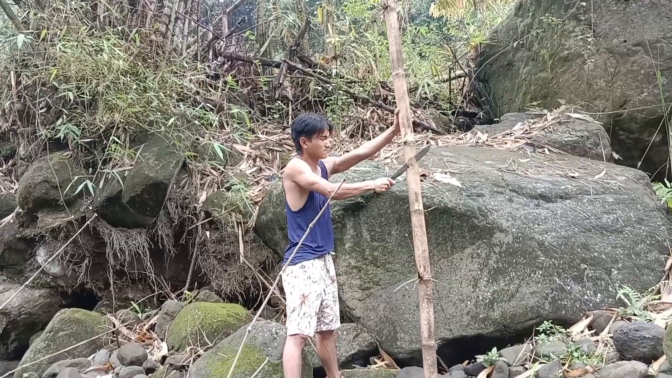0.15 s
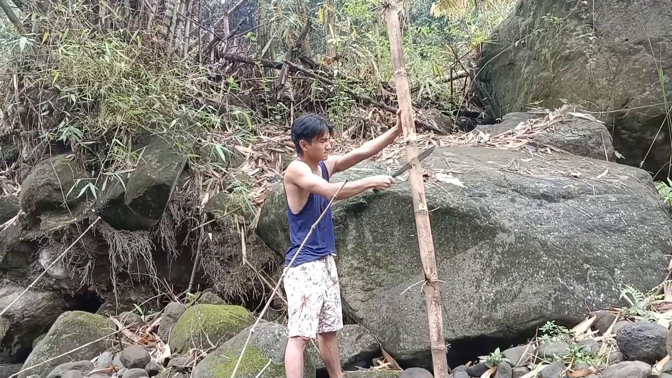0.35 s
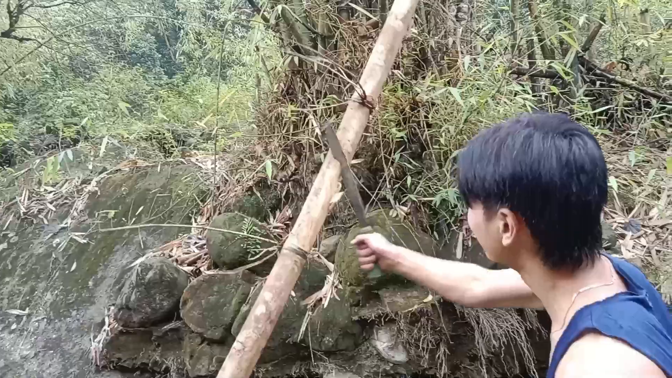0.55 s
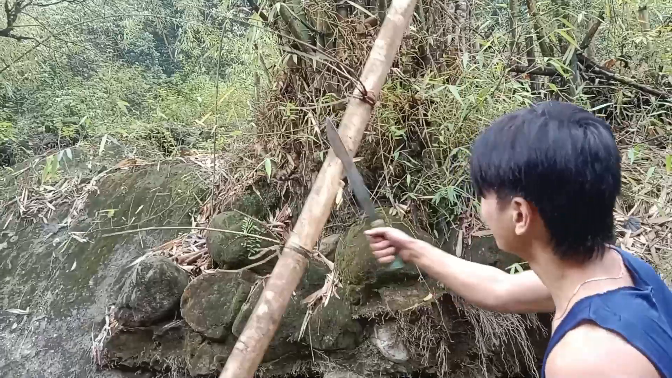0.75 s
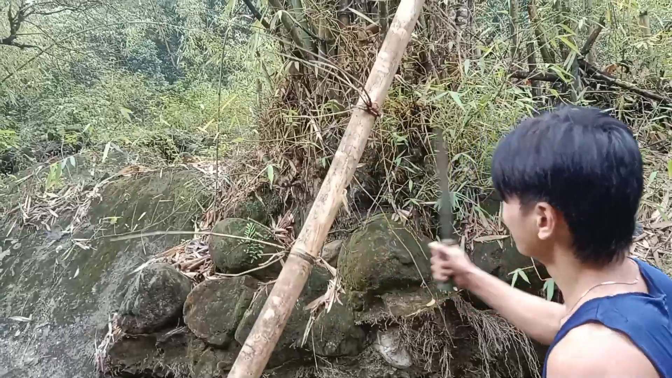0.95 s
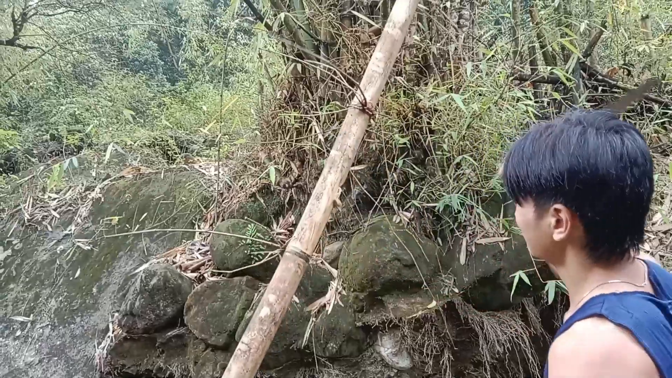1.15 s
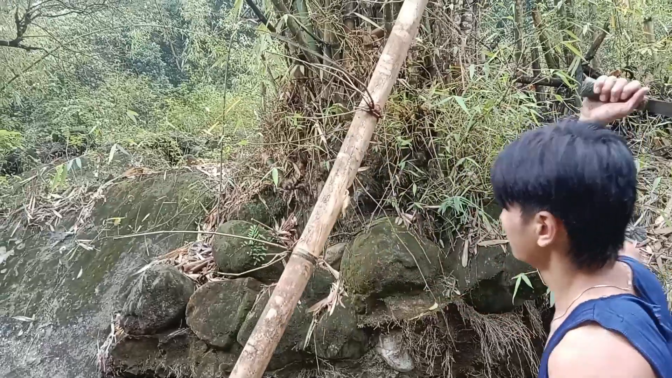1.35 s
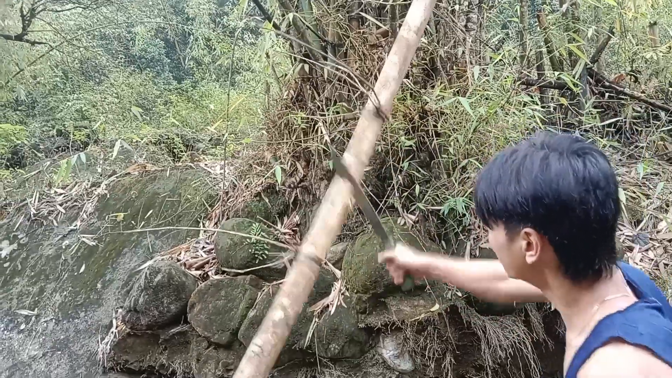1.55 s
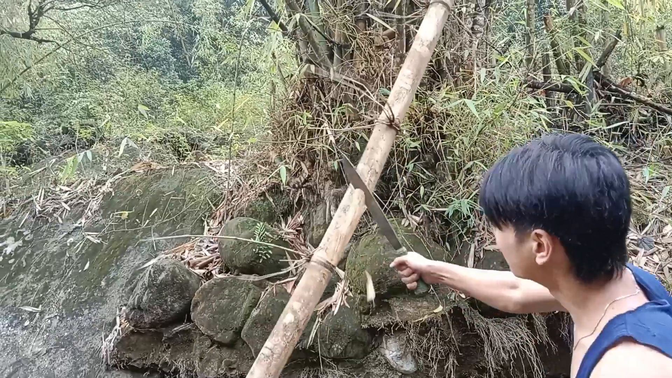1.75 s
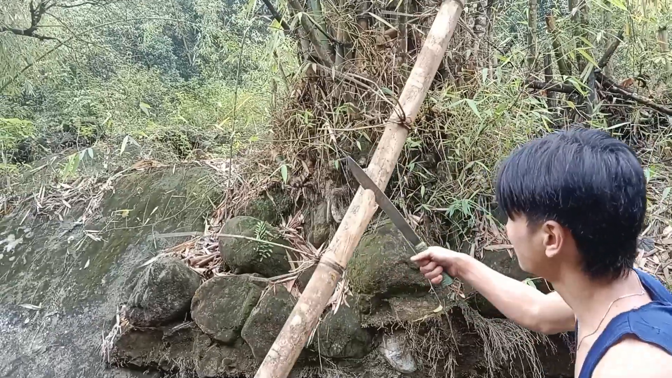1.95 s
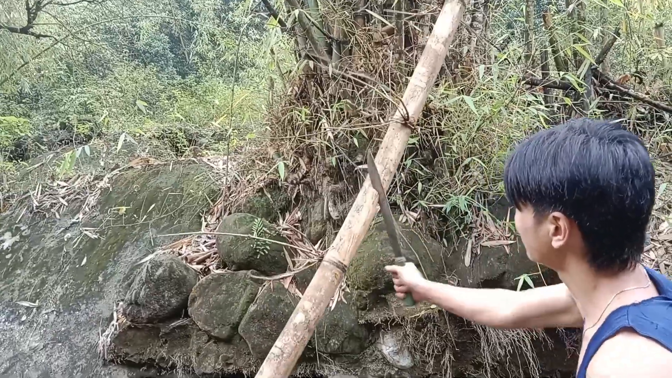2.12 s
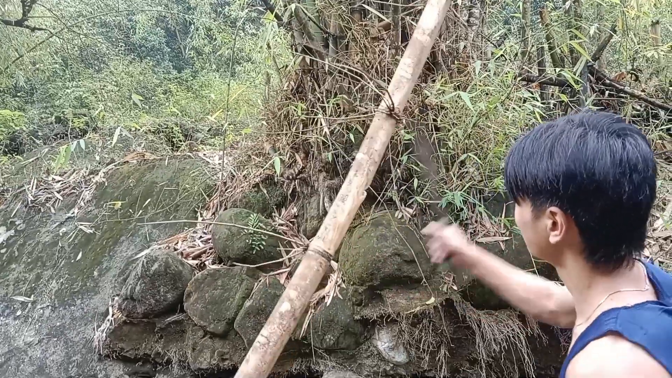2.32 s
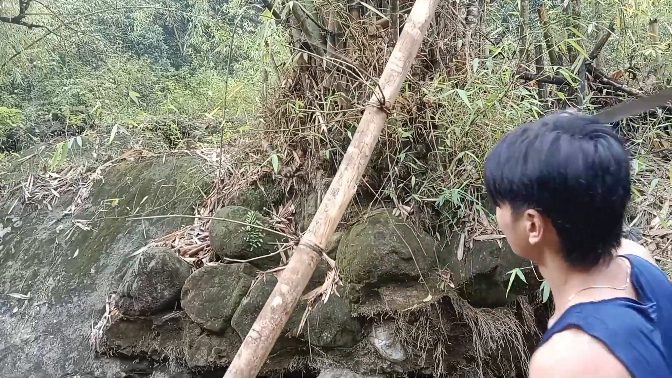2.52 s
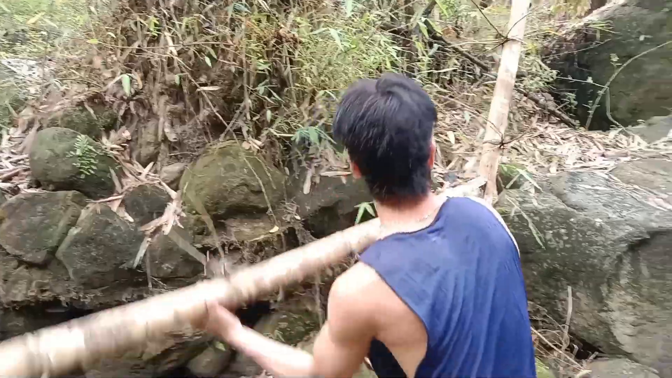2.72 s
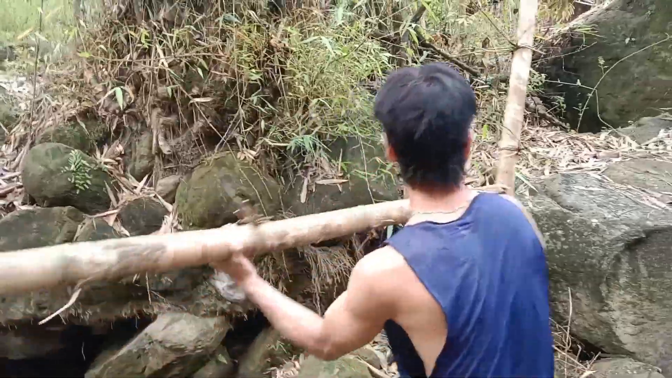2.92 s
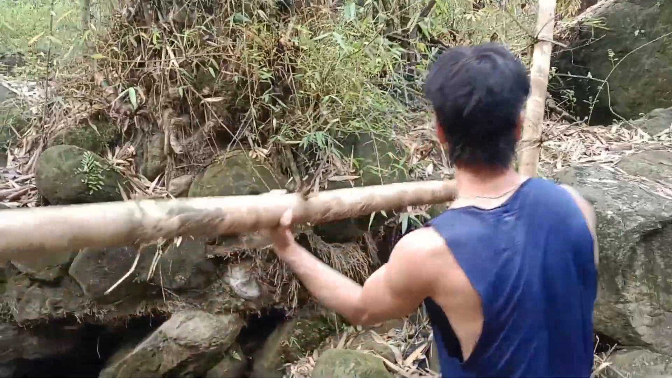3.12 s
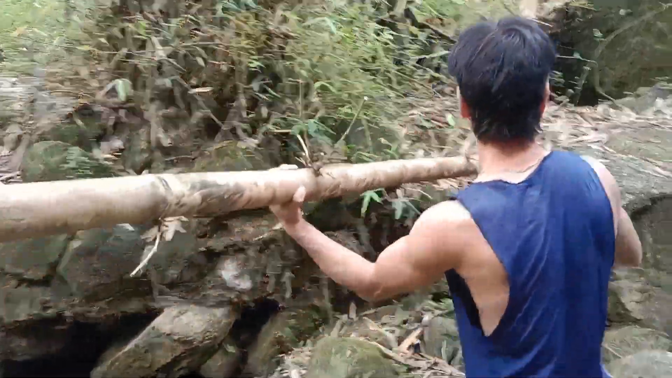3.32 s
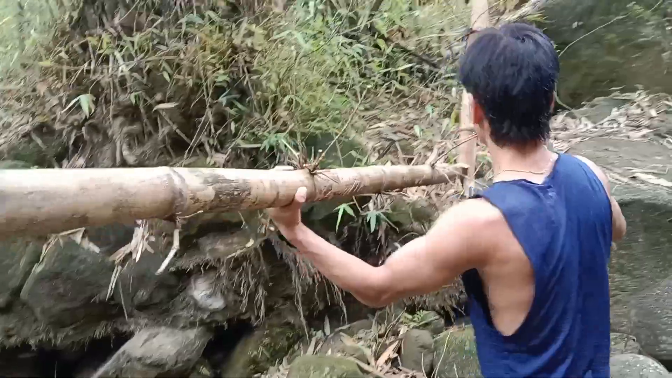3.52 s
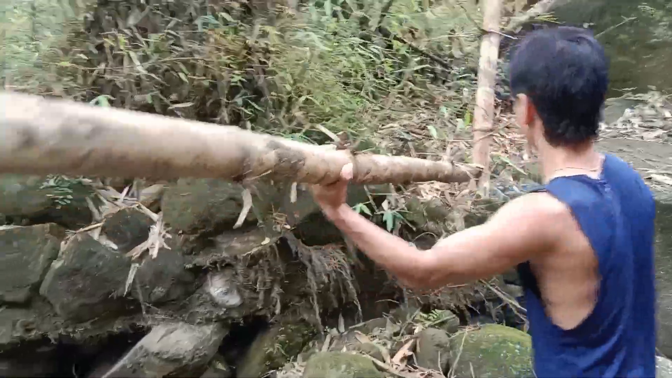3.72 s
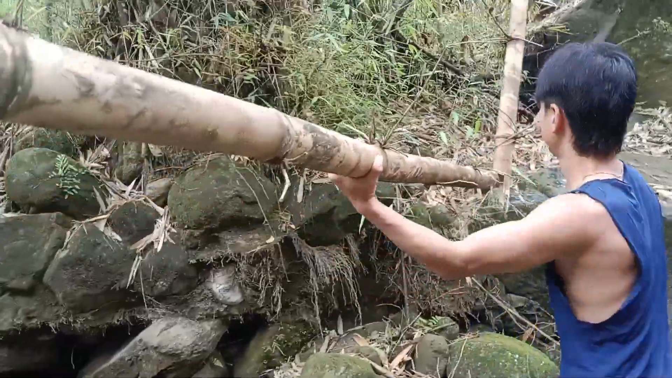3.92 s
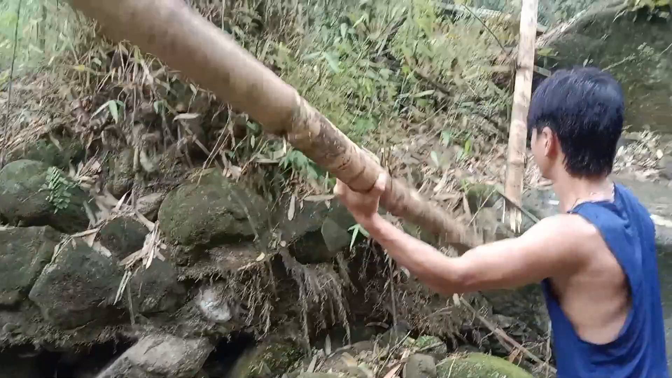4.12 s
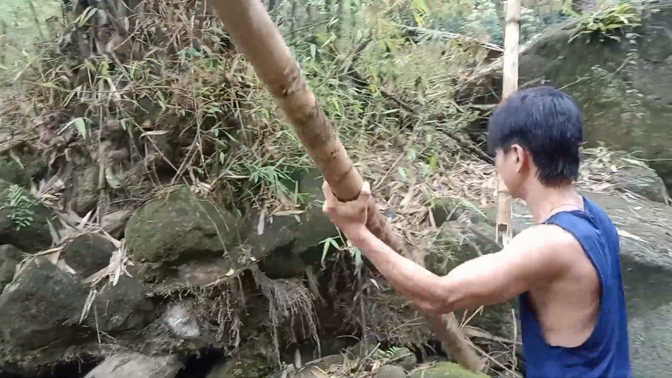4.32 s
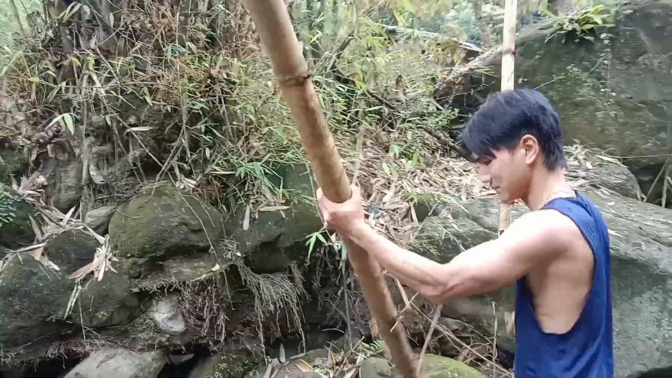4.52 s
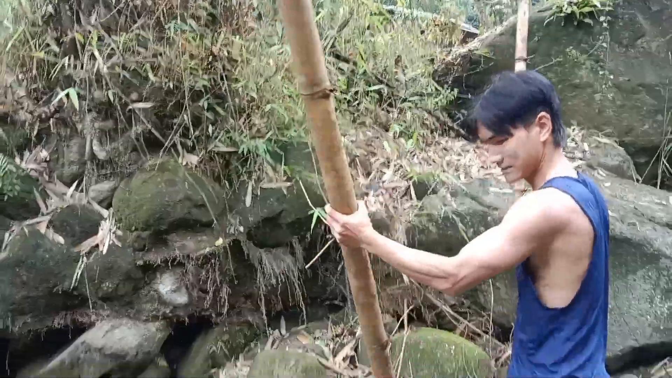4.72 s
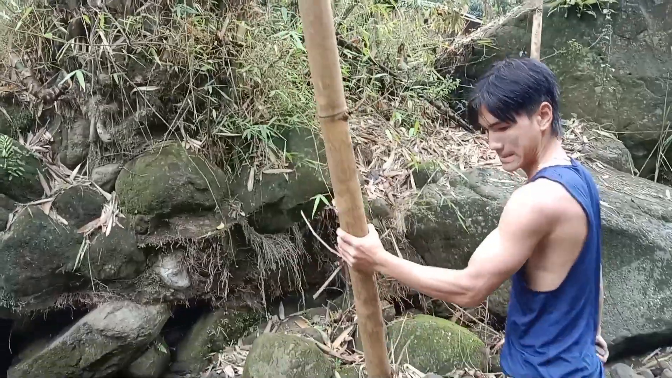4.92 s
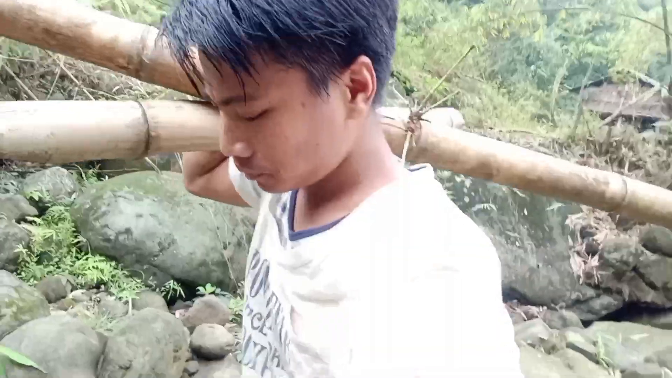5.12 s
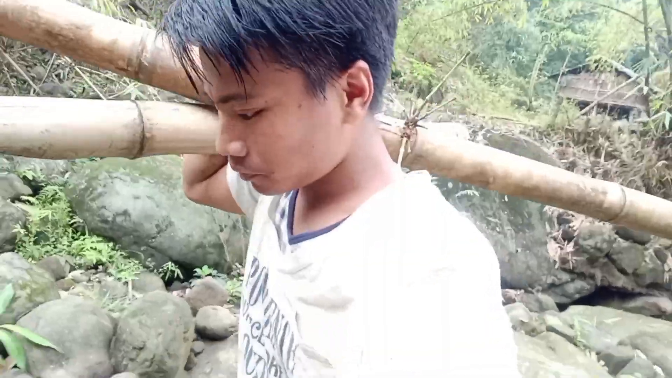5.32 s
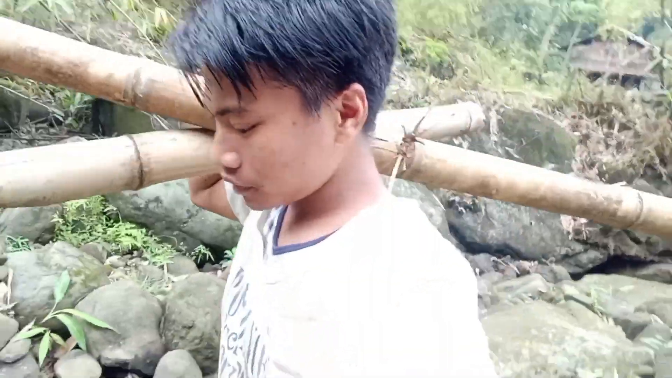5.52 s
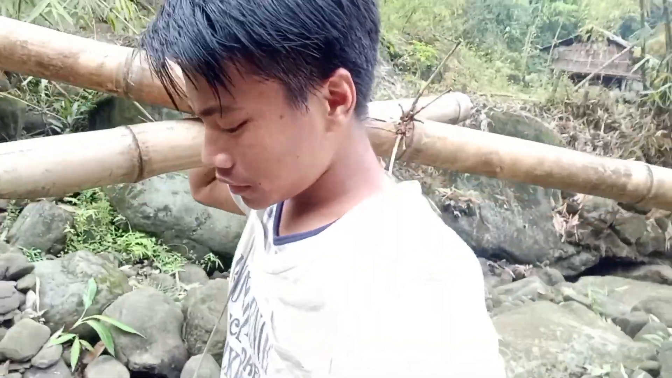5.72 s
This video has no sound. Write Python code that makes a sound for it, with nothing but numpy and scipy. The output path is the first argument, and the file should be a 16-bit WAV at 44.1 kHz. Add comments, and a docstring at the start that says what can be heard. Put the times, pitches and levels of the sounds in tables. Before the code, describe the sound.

A brook splashes with bright, plopping drops from 0 to about 0.7 s, then drops away quickly, leaving faint dry leaf rustle. From 1.1 to 1.5 s small twig ticks and low rubbing hums appear, with a thin high bird whistle near 1.3 s. At 1.66 s a blade strikes standing bamboo: a loud, woody ringing crack with splintering and short scatter. Rustling continues with a wavering whistle around 2 s and snaps at 2.35 and 2.68 s. From 2.7 to 3.3 s the cut pole is dragged through leaves, crackling densely, sharpest at 3.1 s; then it quietens. A brief squeak and loud hollow knock on rock come at 4.12 s, cut off abruptly by 4.2 s. Sharp taps follow at 4.53 and 4.6 s, then near quiet. At 5.44 s a softer bundle knock and low hollow thuds run until about 5.75 s. Outdoors, mono, with dulled bass.

```python
"""A brook splashes and fades out while dry leaves rustle, as they go on doing: noise in uneven bands.
Twigs snap as short sprays of clicks; small birds whistle and rubbed bamboo squeaks as wavering sines.
A blade chops a standing bamboo pole among boulders: ringing modes, splintering noise and an echo.
The cut pole is dragged down, knocks on rock, its tail cut short, and is shouldered in a bundle.
The deep dip of a small microphone near 5 kHz is part of most of the noise spectra."""
import sys
import numpy as np
from scipy import signal
from scipy.fft import rfft, irfft
from scipy.io import wavfile
from scipy.ndimage import uniform_filter1d

SR = 44100
rng = np.random.default_rng(int(sys.argv[2]) if len(sys.argv) > 2 else 0)


def master(y):
    """Save y as 16-bit WAV."""
    cut = np.clip(np.atleast_2d(y).T, -1, 1)
    pcm = np.round(cut * 32767)  # scale
    wavfile.write(sys.argv[1], SR, pcm.astype(np.int16))


N = 254016
T = np.arange(N) / SR  # time/s


def from_db(db):
    """Level to amplitude: 20 dB is a factor of ten."""
    return 10 ** (np.asarray(db) / 20)


def rms_one(x):
    """Normalisation to unit mean power."""
    return x / np.sqrt(np.mean(x ** 2) + 1e-20)


def in_time(rows):
    """Linear interpolation of each column of a curve table at every sample."""
    s, *columns = np.transpose(rows)
    return [np.interp(T, s, c) for c in columns]


def colour(x, spectrum):
    """Minimum-phase filtering: the folded cepstrum gives a causal response, here of unit energy."""
    size = 8192
    hz, db = np.transpose(spectrum)
    grid_hz = np.arange(size // 2 + 1) * SR / size
    log_gain = np.interp(np.log(grid_hz + 1), np.log(hz), db) * np.log(10) / 20
    cepstrum = irfft(log_gain)
    cepstrum[1:size // 2] *= 2
    cepstrum[size // 2 + 1:] = 0
    response = irfft(np.exp(rfft(cepstrum)))
    return signal.fftconvolve(x, response / np.linalg.norm(response))[:len(x)]


def band(x, low_hz, high_hz, order=2):
    """Band limitation by a Butterworth filter, flat in its passband."""
    return signal.sosfilt(signal.butter(order, [low_hz, high_hz], "band", fs=SR, output="sos"), x)


def drift(rate):
    """Random modulation: noise through two equal low-pass poles at rate/Hz, scaled to rms 1."""
    step = 40  # samples between the computed points
    r = np.exp(-2 * step * np.pi * rate / SR)
    settle = 2000
    noise = rng.standard_normal(N // step + settle + 2)
    slow = signal.lfilter([1], [1, -2 * r, r * r], noise)[settle:]
    return np.interp(np.arange(N) / step, np.arange(len(slow)), rms_one(slow))


def grains(per_s, spread_db, share):
    """Shot noise: sparse clicks of uneven size hold a share of the power, smooth noise the rest."""
    sizes = from_db(spread_db * np.minimum(rng.exponential(1, N), 4)) * rng.choice([-1, 1], N)
    clicks = rms_one(sizes * (rng.random(N) < per_s / SR))
    share = np.clip(share, 0, 1)
    return np.sqrt(share) * clicks + np.sqrt(1 - share) * rng.standard_normal(N)


def patchy(x, together_db, own_db, rate):
    """Band-wise modulation: narrow bands swell together and alone, summed into four layers and a hiss."""
    # frequencies dividing the layers: f/Hz
    layer_feet = 450, 1000, 2100, 4800
    parts, together = np.zeros((5, N)), drift(14.0)
    edges = np.r_[np.geomspace(35, 400, 10), np.geomspace(430, layer_feet[-1], 32)]
    for low, high in zip(edges, edges[1:]):
        part = np.searchsorted(layer_feet, low)
        level_db = together_db * together + own_db[part] * drift(rate)
        parts[part] += band(x, low, high) * from_db(level_db)
    parts[-1] = band(x, layer_feet[-1], 17000) * from_db(together_db * together)
    return parts


def swell(t, rise, t60):
    """Transient envelope: linear rise from t = 0, then exponential decay of 60 dB in t60."""
    rise = max(rise, .0003)
    return np.clip(t / rise, 0, 1) * from_db(-60 * np.clip((t - rise) / t60, 0, 3))


def ring(drive, modes):
    """Modal superposition: damped resonances, neighbours in opposite senses, driven by a contact."""
    out = 0
    for k, (hz, db, t60) in enumerate(modes):
        r = from_db(-60 / (min(t60, .3) * SR))
        w = 2 * np.pi * hz / SR
        gain = (-1) ** k * from_db(db) * np.sin(w)
        out = out + signal.lfilter([0, gain], [1, -2 * r * np.cos(w), r * r], drive)
    return out


def blows():
    """Impact excitation: a ringing tube, splintering fibres and scattered echo of boulders and trees."""
    # blows on bamboo: t/s, ring level/dB, delay of main hit/s, ratio of main hit to first touch,
    # crack level/dB, crack t60/s, echo level/dB, echo t60/s
    strikes = [(1.664, -12, 0.0033, 1.7, -10, 0.19, -41, 0.55),
               (4.1252, -11, 0.0025, 5.6, -10, 0.092, -24, 0.98),
               (5.4382, -17.5, 0.0023, 1.1, -54, 0.081, -27, 0.27)]
    # times at which the tails are cut off: t/s
    ends = 2.6, 4.193, 5.76
    # tube modes: f/Hz, level re ring/dB, t60/s (0.3 s at most is used)
    standing, felled, bundle = [(191.6, -5, 0.12), (341, -10, 0.23), (456, -2, 0.094), (680, 5, 0.089),
                                (847, 3.5, 0.019), (1054, -10, 0.3), (1150, -12.5, 0.17), (1350, -12, 0.11),
                                (1512, 2.5, 0.096), (1900, -10, 0.19), (2240, -6, 0.11), (2485, 13, 0.029),
                                (2640, -2.5, 0.15), (2800, -7.5, 0.082), (3860, -21, 0.12)], [(228, -12, 0.6), (500, 1.5, 0.14), (633, -3.5, 0.082),
                                                  (807, 4, 0.04), (935, 2, 0.073), (1233, -13.5, 0.24),
                                                  (1544, -12, 0.22), (1650, -16.5, 0.072), (2320, 2, 0.07),
                                                  (3010, -22.5, .15), (3300, -17.5, .15)], [(416, 1, 0.067), (547, -14, 0.18),
                                                                  (802, -11, 0.1), (1040, -8, 0.063),
                                                                  (1570, -8, 0.043), (2120, -22, .05)]
    # noise spectra of crack and echo: f/Hz, relative level/dB
    standing_crack, felled_crack = [(24, -66), (40, -37.5), (164, -15), (377, -14.5), (438, -3), (523, -9),
                                    (672, -5.5), (910, -5.5), (1470, -9), (3730, -16), (4800, -39),
                                    (7940, -12.5), (9710, -35), (14900, -39), (16500, -40)], [(24, -58), (40, -24), (160, -50.5), (222, -22),
                                                            (324, -14.5), (510, -5.5), (910, -11.5),
                                                            (1110, 3), (1230, -15.5), (1540, -10.5),
                                                            (3050, -15), (4680, -37.5), (8140, -21),
                                                            (15300, -51), (16500, -73)]
    bundle_crack = [(24, -48), (40, -28), (427, 3), (1510, -3.5), (3290, -19), (4560, -47), (4920, -56),
                    (6170, -38), (7940, -20), (15300, -34), (16500, -52)]  # f/Hz, relative level/dB
    out = np.zeros(N)
    poles = (standing, standing_crack), (felled, felled_crack), (bundle, bundle_crack)
    for strike, (modes, crack_colour), end in zip(strikes, poles, ends):
        s, ring_db, main_s, main, crack_db, crack_t60, echo_db, echo_t60 = strike
        start = round(s * SR)
        t = np.arange(min(SR, N - start)) / SR
        push = t * np.exp(-t / .00004)
        push = push + main * np.roll(push, round(main_s * SR))  # the main hit follows a first touch
        tube = from_db(ring_db) * ring(push / push.sum() + 1e-18, modes)
        spray = from_db(crack_db - 60 * t / crack_t60) + from_db(echo_db - 60 * t / echo_t60)
        noise = spray * np.clip(t / 0.002, 0, 1) * rng.standard_normal(len(t))
        crack = colour(noise, crack_colour)
        out[start:][:len(t)] += (tube + crack) * np.clip((end - s - t) / .002, 0, 1)
    return out


def thuds():
    """Air resonance: a soft contact rings the air in the tube as a decaying sine with rough noise."""
    # hollow thuds of a pole: t/s, sine level/dB, f/Hz, rise/s, t60/s
    contacts = [(1.93, -46, 136, 0.023, 0.33), (2.352, -45.5, 137, 0.041, 0.14),
                (2.716, -48, 235, 0.0074, 0.11), (4.527, -23, 265, 0.0079, 0.014),
                (4.607, -41, 200, .004, 0.097), (5.251, -55, 104, 0.012, 0.076),
                (5.481, -32.5, 378, 0.0033, 0.11), (5.5964, -21.5, 185, 0.0038, 0.021),
                (5.608, -28, 215, 0.0024, 0.068), (5.679, -29, 197, 0.0012, 0.074),
                (5.703, -34.5, 274, 0.003, 0.074)]
    out, rough = 0, rms_one(band(rng.standard_normal(N), 42, 227))
    for s, db, hz, rise, t60 in contacts:
        tone = np.sin(2 * np.pi * hz * (T - s))
        out = out + from_db(db) * swell(T - s, rise, t60) * (tone + 0.33 * rough)
    return out


def snaps():
    """Brittle fracture: each snap is a dying spray of clicks with a body, treble and air."""
    # snaps and taps: t/s, body peak level/dB, body centre f/Hz, treble peak level/dB,
    # air peak level/dB, rise/s, t60/s
    breaks = [(1.108, -39, 830, -33.5, -65, 0.0019, 0.04), (1.304, -31, 2500, -44, -60, 0.0033, .04),
              (1.474, -28.5, 1660, -47, -63, 0.0012, 0.0097), (1.518, -31.5, 844, -51, -58, 0.005, 0.042),
              (2.106, -31, 1310, -40, -57, 0.0027, 0.037), (2.261, -47, 2350, -18.5, -28, 0.00067, 0.01),
              (2.268, -50, 2350, -29.5, -23, 0.0011, 0.01), (2.35, -21.5, 2280, -28.5, -55, 0.0088, 0.066),
              (2.678, -21.5, 1380, -36, -45, 0.0015, 0.028), (2.727, -48, 1500, -37, -38, 0.00082, 0.011),
              (2.908, -26, 1350, -27.5, -33, 0.00079, 0.036), (2.945, -26.5, 810, -32, -40, 0.00081, 0.069),
              (2.987, -22, 1270, -28, -36, 0.001, 0.081), (3.031, -31, 800, -49, -43, 0.00082, 0.026),
              (3.091, -12.5, 1760, -22.5, -37, 0.0016, 0.06), (3.172, -28, 1570, -41, -43, 0.0011, 0.042),
              (3.239, -27.5, 2150, -36, -44, 0.0015, 0.041), (3.619, -43, 2000, -45, -52, 0.00089, 0.016),
              (3.82, -29.5, 1620, -53, -57, 0.00091, .025), (3.885, -31.5, 1760, -51, -54, 0.00069, 0.034),
              (4.095, -35, 1710, -29, -36.5, 0.0029, 0.15), (4.492, -42, 2000, -33.5, -40, 0.004, 0.047),
              (4.531, -10.5, 1720, -19, -29, 0.00022, 0.0015),
              (4.607, -17, 2000, -23.5, -38, 0.00041, 0.0087),
              (5.405, -42, 1730, -32.5, -38, 0.0084, 0.094), (5.48, -26.5, 2400, -32, -35, 0.0013, 0.039),
              (5.642, -50, 930, -30, -30, 0.00085, 0.015), (5.732, -57, 800, -31.5, -34, 0.00088, 0.0053)]
    # spectrum of a snap: f/Hz, relative level/dB
    snap_colour = [(35, -54), (60, -20), (334, -46), (691, -10), (1080, 0.5), (2190, 0.5), (2520, 2),
                   (3500, -10.5), (4750, -43.5), (7240, -3.5), (9610, -13.5), (15000, -21), (16500, -42.5)]
    out, t = np.zeros(N + SR), np.arange(SR // 4) / SR
    noises = rng.choice([-1., 1.], (len(breaks), len(t)))
    for (s, body_db, hz, treble_db, air_db, rise, t60), noise in zip(breaks, noises):
        burst = colour(noise * swell(t, rise, t60), snap_colour)
        layers = ((body_db, (hz / 1.5, hz * 1.83)),
                  (body_db - 17.5, (3400, 6000)),
                  (treble_db, (6000, 9200)),
                  (air_db, (9200, 16500)))
        for db, edges in layers:
            part = band(burst, *edges, order=3)
            out[round(s * SR):][:len(t)] += from_db(db) * part / np.abs(part).max()
    return out[:N]


def handling():
    """Friction noise: dry leaves brush along the pole, which hums and rumbles in the hands."""
    # spectra of the layered rustle, the hiss and the mid-treble rustle: f/Hz, relative level/dB
    rustle_colour, hiss_colour = [(24, -72), (40, -28), (92, -20), (340, -21), (500, -22), (587, -11.5),
                                  (690, -14), (812, -7.5), (954, -13.5), (1290, 0), (2840, -6.5),
                                  (3480, -14.5), (4710, -56.5), (5000, -66.5), (6500, -45.5), (11000, -120)], [(2650, -53), (4500, -27.5), (4860, -38.5),
                                                         (5020, -35.5), (5300, -29), (5410, -39.5),
                                                         (5900, -27.5), (6410, -2), (7580, 0), (8780, -2),
                                                         (9470, -15), (15200, -19.5), (15900, -29.5),
                                                         (16500, -64.5)]
    mid_treble_colour = [(2120, -28), (3600, 3), (4290, -10.5), (4590, -29), (4780, -34.5), (5370, -8.5),
                         (6400, -12.5), (8320, -39.5), (14100, -120)]  # f/Hz, relative level/dB
    # how hard the leaves are stirred: t/s, hiss level/dB
    stir = [(0, -65), (.6, -63.5), (.74, -60), (1.1, -51.5), (1.18, -55), (1.31, -51.5), (1.53, -49),
            (1.65, -57.5), (1.7, -37), (1.9, -47), (2.07, -52), (2.3, -52), (2.38, -50), (2.54, -57),
            (2.62, -50), (2.665, -59.5), (2.685, -49.5), (2.73, -43.5), (2.86, -46), (3.08, -47.5),
            (3.25, -50.5), (3.41, -61.5), (3.5, -60), (3.74, -51.5), (3.9, -53), (4.03, -63), (4.11, -48),
            (4.2, -54), (4.26, -46.5), (4.4, -54), (4.62, -49), (4.7, -56.5), (4.9, -56.5), (4.99, -64),
            (5.15, -61.5), (5.4, -56), (5.48, -45), (5.58, -54), (5.76, -52)]
    # stages of the work: start t/s, then levels re hiss/dB of pole rumble, pole hum, dull rustle,
    # crisp rustle and mid-treble rustle (the last as at the middle stir)
    stages = [(0, 2.5, 8, 28.5, 9, -13), (0.728, -15.5, -2, 4, 1.5, -25), (1.66, -12.5, -3, 5.5, 5.5, -23),
              (2.675, -13, -1.5, 6.5, 1, -17.5), (2.86, -16.5, -9.5, 5, 5, -22.5),
              (3.3, -10.5, -6, 6.5, 6, -38), (4.195, -13.5, -12, 3.5, 5.5, -21),
              (4.65, -10, -12, -3, 5, -35), (5.0, -9, -10, 1.5, 1.5, -30), (5.199, -5, 0, 4, -11, -21),
              (5.41, -4, 1.5, 4, -6, -33), (5.56, 1.5, 0, -0.5, -18, -25)]
    # rustle around 3.6 to 6.4 kHz, which swells more steeply than the hiss (growth in dB/dB)
    mid_treble_growth, middle_stir_db = 0.93, -56
    leaves = grains(500, 3.3, 0.19)
    parts = patchy(colour(leaves, rustle_colour), 0.35, (4.2, 9.0, 4.9, 2.8), 7.44)
    parts[-1] = colour(leaves, hiss_colour) * from_db(1.5 * drift(30.0))
    stir_db, = in_time(stir)
    starts, *above = np.transpose(stages)
    stage = np.searchsorted(starts[1:], T)
    *above_db, mid_treble_db = uniform_filter1d(np.array(above)[:, stage], size=441, axis=1)  # over 10 ms
    mid_treble_db = mid_treble_db + mid_treble_growth * (stir_db - middle_stir_db) + 1.5 * drift(12.0)
    mid_treble = from_db(mid_treble_db) * rms_one(colour(leaves, mid_treble_colour))
    layers = sum(from_db(db) * rms_one(part) for db, part in zip(above_db + [0], parts))
    return from_db(stir_db) * (mid_treble + layers)


def rubs():
    """Resonant friction: rubbing makes the air in the pole hum, as noise in a narrow band."""
    # rubs: start t/s, length/s, level before wavering/dB, f/Hz
    strokes = [(0, 0.03, -47, 450), (0.501, 0.043, -48, 610), (0.791, 0.21, -55, 611),
               (0.898, 0.16, -56, 800), (1.097, 0.043, -45.5, 780), (1.198, 0.082, -49.5, 843),
               (1.376, 0.21, -49.5, 823), (1.434, 0.15, -56.5, 603), (1.699, 0.074, -37.5, 402),
               (1.835, 0.094, -45.5, 626), (1.843, .3, -52, 771), (2.6, 0.044, -56.5, 704),
               (2.681, 0.11, -46.5, 573), (2.876, 0.09, -41.5, 760), (2.994, 0.052, -42, 773),
               (3.078, 0.05, -36, 726), (3.102, 0.11, -49, 1070), (3.155, 0.047, -51.5, 677),
               (3.241, 0.046, -45.5, 890), (3.335, 0.059, -53.5, 975), (3.683, .3, -54.5, 1060),
               (3.82, 0.053, -58, 330), (4.2, 0.051, -51, 230), (4.2, 0.15, -50, 1063),
               (4.187, 0.088, -45.5, 480), (4.537, .035, -48.5, 300), (4.534, 0.032, -43, 1034),
               (4.627, 0.041, -54.5, 258), (4.903, 0.062, -60.5, 828), (5.246, 0.15, -57, 895),
               (5.268, 0.034, -52, 513), (5.576, 0.11, -48, 1025), (5.684, 0.038, -41.5, 894),
               (5.69, 0.023, -41, 447)]
    edge_s, width_hz = 0.025, 90
    out, friction = 0, grains(300, 3.6, 0.28)
    for s, length, db, hz in strokes:
        gate = np.clip(np.minimum(T - s, s + length - T) / edge_s + .5, 0, 1)
        hum = rms_one(band(friction, hz - width_hz / 2, hz + width_hz / 2))
        out = out + from_db(db) * gate * hum
    return out * from_db(1.23 * drift(26.0))


def whistles():
    """Frequency and amplitude modulation: thin sines glide and waver."""
    # bird whistles and squeaks of rubbing bamboo, before wavering: t/s, f/Hz, level/dB
    calls = [
        [(1.25, 7350, -57), (1.3, 7350, -41.5), (1.38, 7330, -64)],
        [(1.5, 5200, -61), (1.53, 5170, -67), (1.6, 5150, -81)],
        [(1.55, 4750, -74), (1.575, 4350, -62), (1.61, 4100, -69), (1.65, 3870, -45)],
        [(1.94, 3690, -45), (1.99, 3570, -52), (2.02, 3580, -42), (2.1, 3530, -53)],
        [(4.108, 1700, -35.5), (4.124, 1770, -36.5)],
        [(4.645, 5800, -61), (4.66, 5800, -59), (4.68, 5700, -70)],
        [(5.405, 3500, -59), (5.435, 3370, -44)],
    ]
    out = 0
    for rows in calls:
        hz, db = in_time(rows)
        fade = np.clip(np.minimum(T - rows[0][0], rows[-1][0] - T) / 0.0028, 0, 1)
        loudness = from_db(db + 2.4 * drift(60.0))
        phase = 2 * np.pi * np.cumsum(hz * (1 + 0.019 * drift(90.0))) / SR
        out = out + fade * loudness * np.sin(phase)
    return out


def drops():
    """Damped oscillation: each of the clearest drops is a blip of a few cycles."""
    # drops in the brook: t/s, level/dB, f/Hz
    blips = [(0.077, -25, 2400), (.44, -16.5, 2190), (.505, -20.5, 1280), (0.531, -18.5, 2730),
             (0.644, -25, 2440)]
    rise_s, t60_s = 0.0023, 0.0097
    return sum(from_db(db) * swell(T - s, rise_s, t60_s) * np.sin(2 * np.pi * hz * (T - s))
               for s, db, hz in blips)


def brook():
    """Random superposition: dense splashes merge into coloured noise that fades out."""
    # spectrum of the water: f/Hz, relative level/dB
    brook_colour = [(35, -75), (60, -49), (133, -19.5), (521, -20.5), (614, -8), (675, -27), (1240, 6.5),
                    (2460, 8.5), (2900, 6.5), (3420, -38), (4750, -39.5), (6910, -9.5), (9380, -46),
                    (11100, -50), (16500, -70)]
    level_db, fades_s, gone_s, fade_db = -34.5, 0.62, .74, 16.5
    fade = np.clip((T - fades_s) / (gone_s - fades_s), 0, 1)
    splashes = colour(grains(900, 5.1, 0.21), brook_colour)
    water = patchy(splashes, 0.59, (2.9, 2.8, 1.2, 3.3), 33.0).sum(axis=0)
    return from_db(level_db - fade_db * fade ** 2) * (fade < 1) * rms_one(water)


def scene():
    """Linear superposition of all sources in one channel."""
    return (brook() + drops() + handling() + rubs() + snaps() + thuds() + blows() + whistles())[None]


def record(dry):
    """Band limitation and saturation: the bass is rolled off, peaks are rounded, the top is cut."""
    bass_cut_hz, top_cut_hz = 86, 16600
    thin = signal.sosfilt(signal.butter(2, bass_cut_hz, "high", fs=SR, output="sos"), dry)
    rounded = 1.025 * np.tanh(thin / 1.285)
    return signal.sosfilt(signal.cheby2(14, 60, top_cut_hz, fs=SR, output="sos"), rounded)


dry = scene()
out = record(dry)
master(out)
```